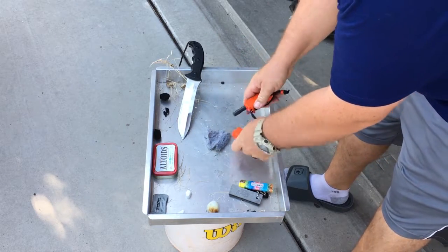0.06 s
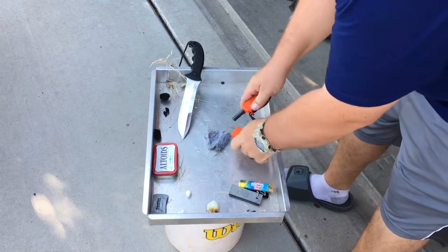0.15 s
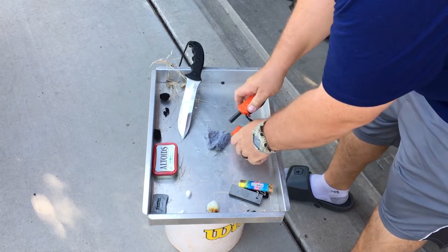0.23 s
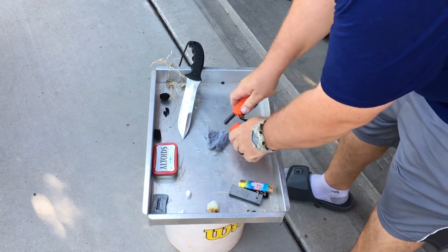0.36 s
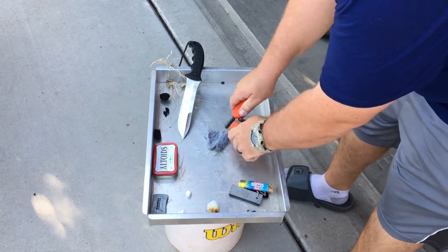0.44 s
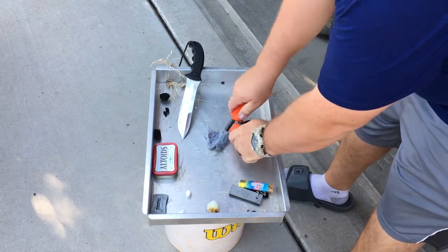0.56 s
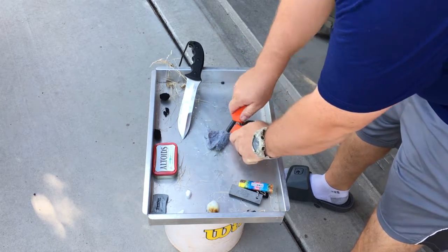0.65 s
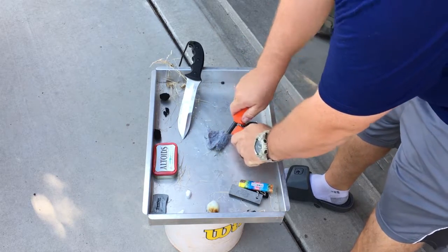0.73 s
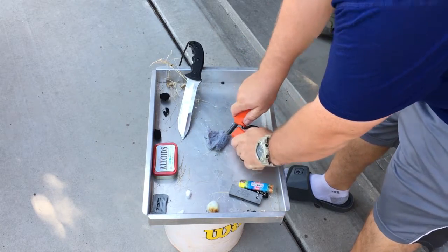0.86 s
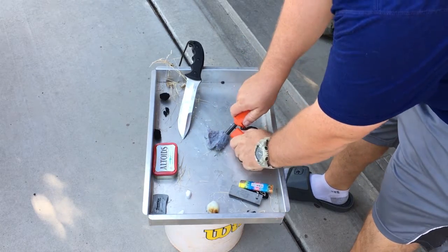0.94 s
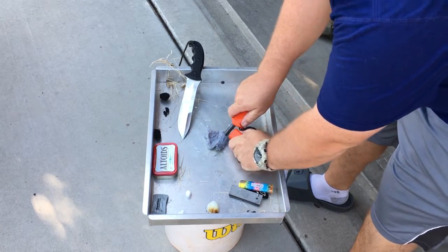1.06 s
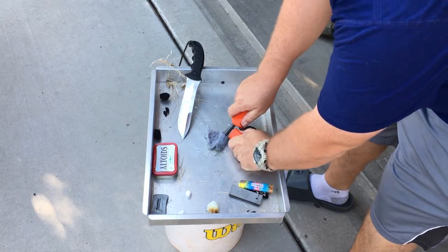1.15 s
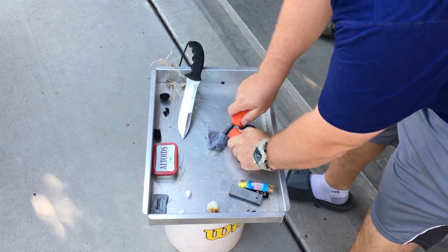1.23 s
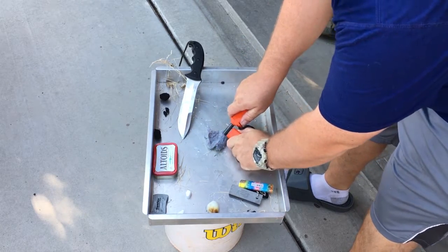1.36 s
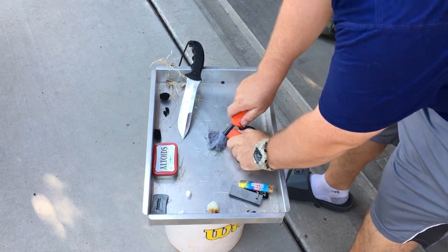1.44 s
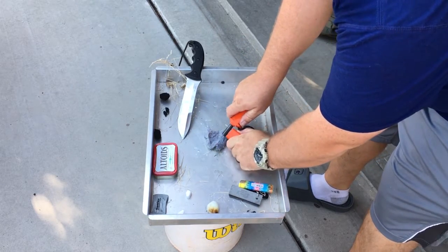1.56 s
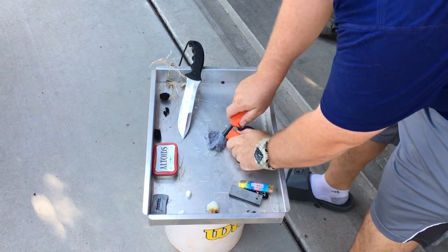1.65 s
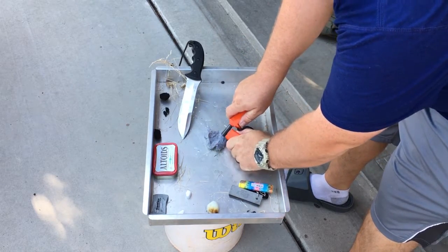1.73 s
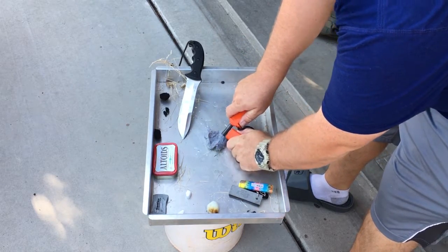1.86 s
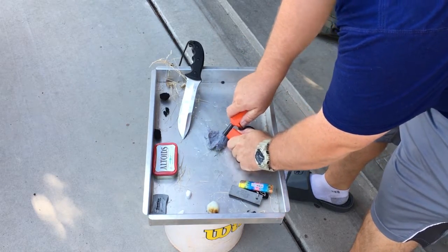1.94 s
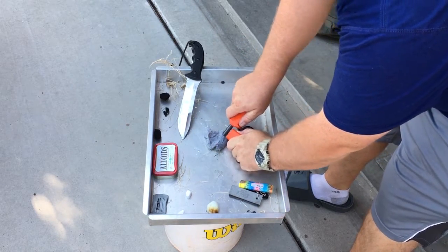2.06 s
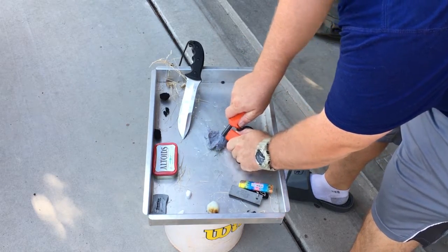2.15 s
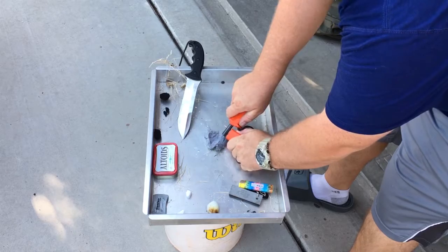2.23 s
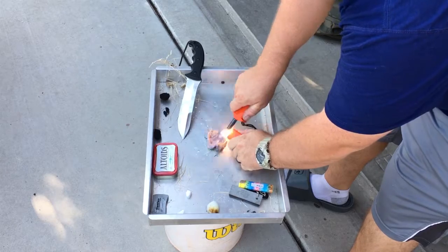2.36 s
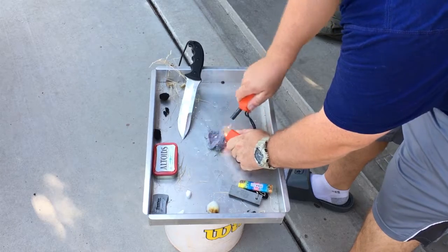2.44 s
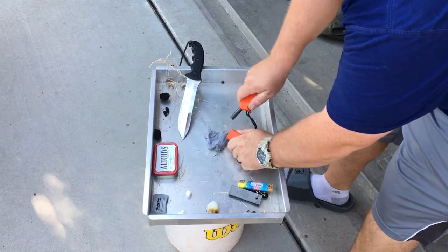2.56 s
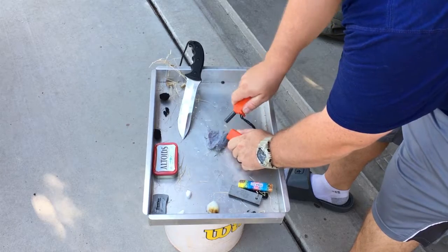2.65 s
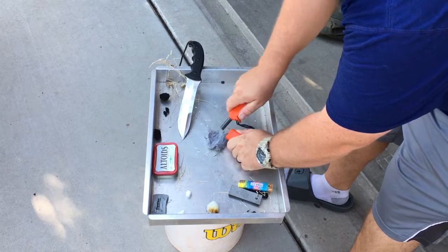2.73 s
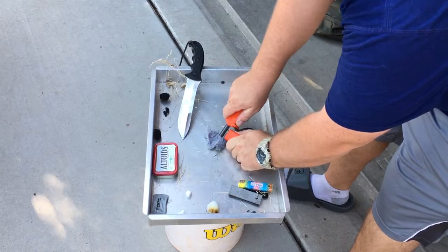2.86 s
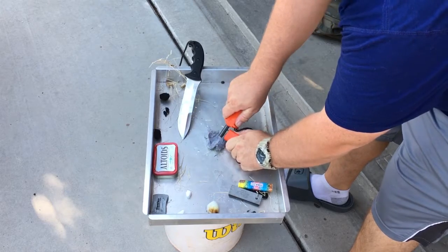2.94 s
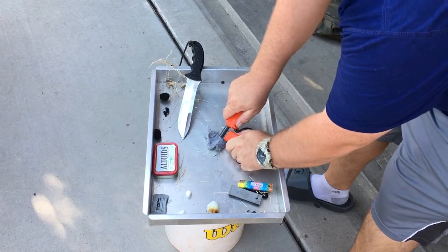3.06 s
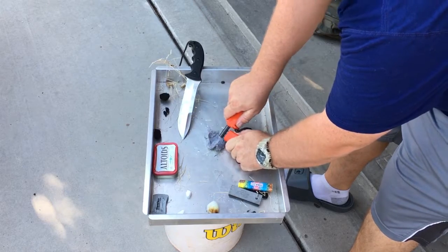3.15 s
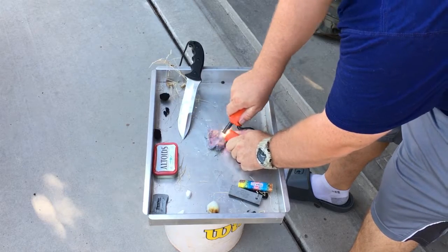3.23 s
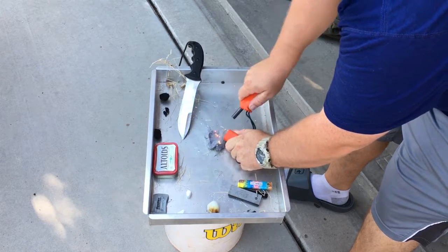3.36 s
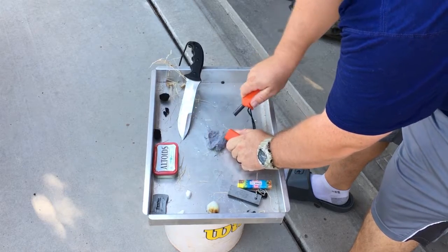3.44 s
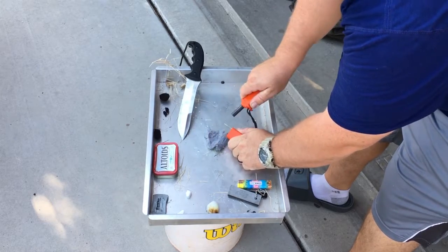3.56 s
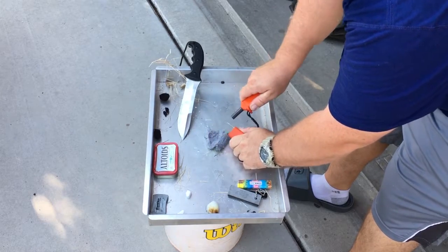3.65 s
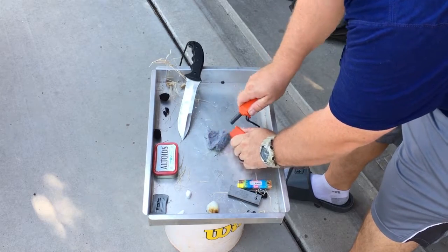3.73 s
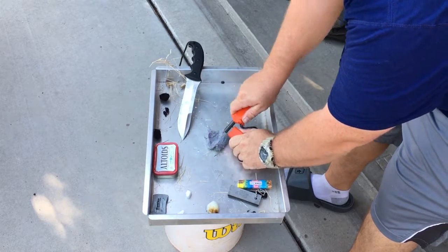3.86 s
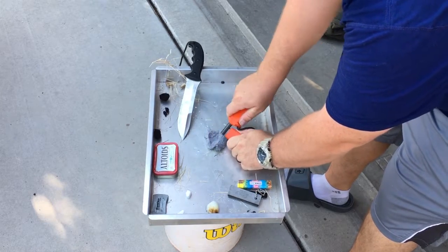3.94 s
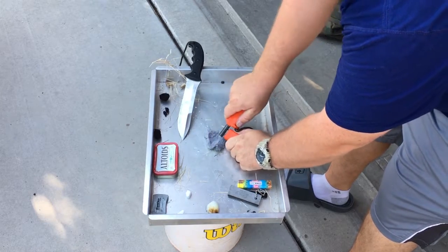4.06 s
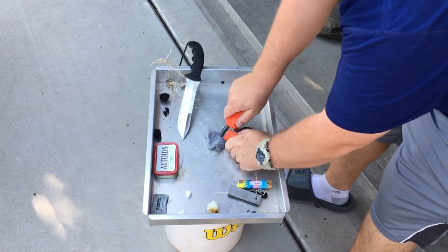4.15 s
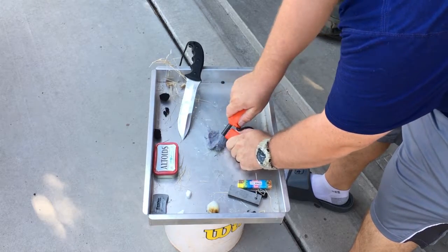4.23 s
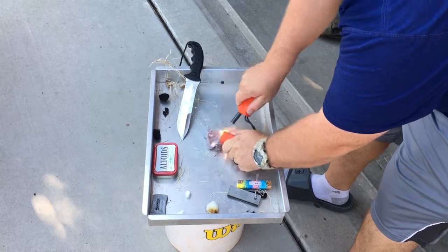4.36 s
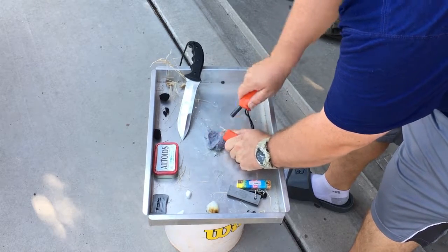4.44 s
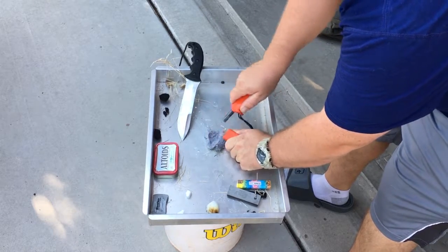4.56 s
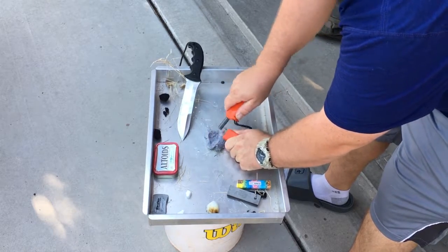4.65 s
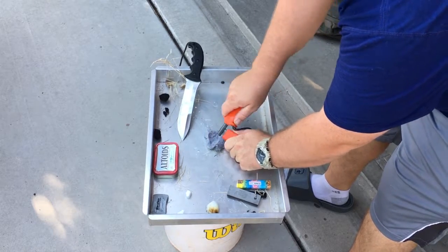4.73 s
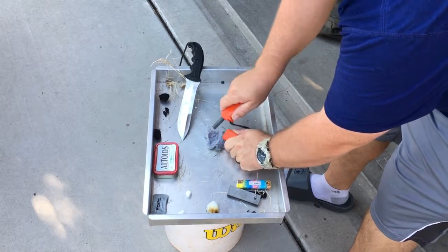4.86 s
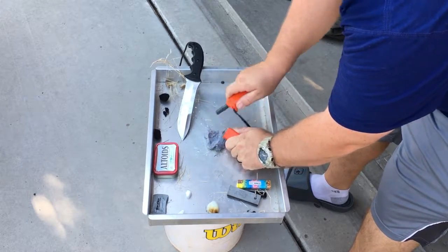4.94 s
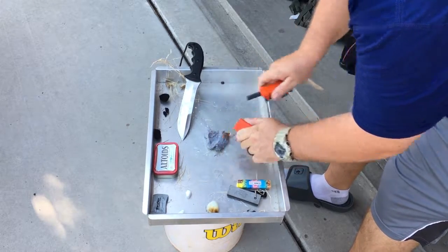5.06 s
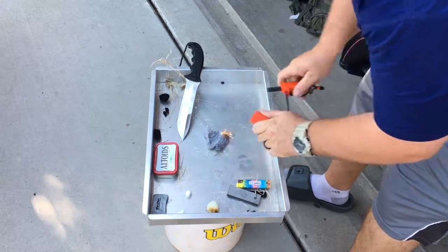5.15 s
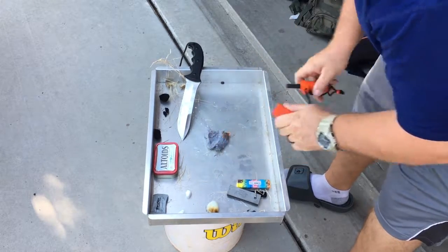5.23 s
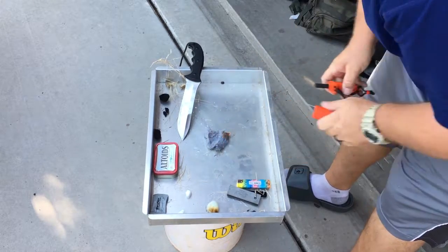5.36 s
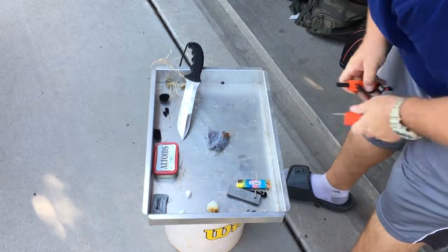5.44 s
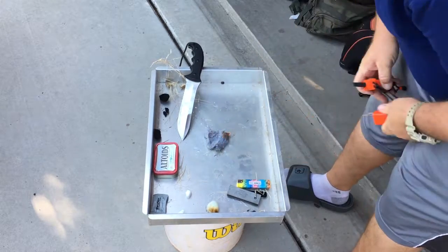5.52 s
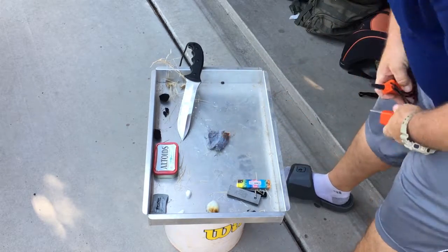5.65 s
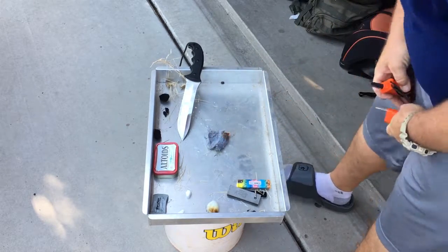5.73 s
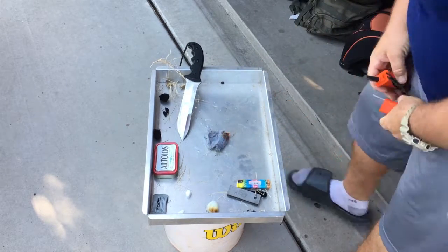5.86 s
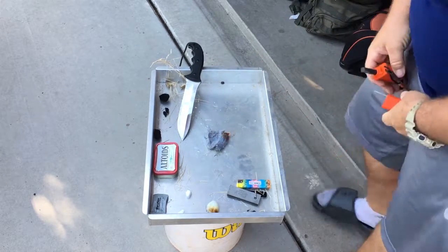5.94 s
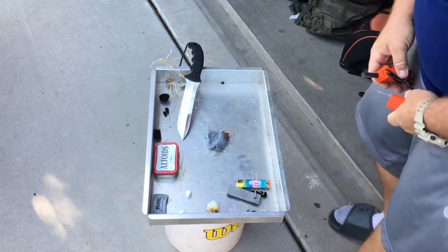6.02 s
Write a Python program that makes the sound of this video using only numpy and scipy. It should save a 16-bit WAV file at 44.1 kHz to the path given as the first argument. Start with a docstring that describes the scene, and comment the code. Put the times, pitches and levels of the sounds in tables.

```python
"""A steel striker clicks sharply onto a ferrocerium rod and is scraped down it three times, over a metal tray.
Clicks are short bursts of ringing steel; scrapes are gritty noise that also rings the rod.
Small rubs come before each stroke, the edge snaps off the end, and sparks flare and sputter as fluttering noise.
Soft knocks and brushes of cloth are shaped noise. A motor, built from sine tones and noise, hums over
a low outdoor rumble and hiss; nearby walls give a short echo made of fading noise."""
import sys
import numpy as np
from scipy import signal
from scipy.fft import rfft, irfft
from scipy.io import wavfile
from scipy.ndimage import uniform_filter1d

SR = 44100
rng = np.random.default_rng(int(sys.argv[2]) if len(sys.argv) > 2 else 0)


def materialize(psi):
    """Save the field psi as 16-bit PCM at rate SR to the path in sys.argv[1].

    A 1-D psi becomes a single channel; in a 2-D psi each row is a channel.
    """
    bounded = np.clip(np.atleast_2d(psi).T, -1, 1)
    quanta = np.round(bounded * 32767).astype(np.int16)
    wavfile.write(sys.argv[1], SR, quanta)


N = 268597
T = np.arange(N) / SR
FREQ = np.maximum(np.arange(N // 2 + 1) * SR / N, 1)

# full strokes down the rod: (start t/s, length/s, level before judder/dB, pitch factor, rod ring level/dB,
# tilt/dB per octave, judder depth/dB, end snap level/dB, snap pitch factor, flame level/dB)
STROKES = [(2.413, .0712, -37.5, 1.01, 2.5, 1.1, 12, -28.5, .9, -54.5),
           (3.327, 0.058, -38.5, 1, 1, .6, 2.5, -36.5, 1.03, -50.5),
           (4.3695, 0.056, -35.5, 1.03, -2, .3, 4.5, -28.5, 0.805, -49.5)]
# colour of the shavings tearing off: (f/Hz, level/dB)
RASP = [(300, -27), (900, -9.5), (1400, -11.5), (2250, 6.5), (2800, -7), (3400, 5.5), (4500, 0), (5600, 4),
        (7000, -4), (8200, 1), (9900, -2.5), (10700, -13), (12000, -14)]


def undb(db):
    """Turn decibels into a gain."""
    return 10 ** (np.asarray(db) / 20)


def unit(x):
    """Scale to an rms (average strength) of 1."""
    return x / np.sqrt(np.mean(x ** 2))


def add(out, s, x):
    """Mix x into out from time s on."""
    i = int(s * SR)
    out[i:i + len(x)] += x[:N - i]


def bins(x):
    """Frequencies of the spectrum of x in Hz, at least 1 so that logarithms work."""
    return np.maximum(np.arange(len(x) // 2 + 1) * SR / len(x), 1)


def colour(x, points):
    """Filter along a curve of (Hz, dB) points; rms 1."""
    hz, db = np.transpose(points)
    curve_db = np.interp(np.log(bins(x)), np.log(hz), db)
    return unit(irfft(rfft(x) * undb(curve_db), len(x)))


def tilt(x, slope_db):
    """Brighten or dull by dB per octave; rms 1."""
    return unit(irfft(rfft(x) * undb(slope_db * np.log2(bins(x))), len(x)))


def resonate(x, modes):
    """Pass through resonances, each (Hz, width in Hz, dB); rms 1."""
    f = bins(x)
    response = sum(undb(db) / (1 + 1j * (f * f - hz * hz) / (f * width)) for hz, width, db in modes)
    return unit(irfft(rfft(x) * response, len(x)))


def grit(n, spread_db):
    """Noise like dense tiny fractures of uneven size."""
    size_db = abs(spread_db) * np.minimum(rng.exponential(size=n), 4)
    return rng.standard_normal(n) * undb(size_db)


def walk(rate):
    """Smooth random drift from `rate` new random values per second; rms 1."""
    k = int(SR / rate)
    steps = np.repeat(rng.standard_normal(N // k + 2), k)
    return unit(uniform_filter1d(uniform_filter1d(steps, k), k)[:N])


def bell(s, half):
    """A smooth swell centred on time s."""
    return np.exp(-.5 * np.minimum(np.abs(T - s) / half, 10) ** 2)


def clicks():
    """The striker clicks onto the rod, and snaps off its end as each stroke finishes."""
    # striker set down on the rod: (t/s, level/dB, ring length factor, pitch factor, tilt/dB per octave,
    # free rod ring level/dB)
    landings = [(0.4968, -23.5, 2.05, 0.971, -1, -17.5), (2.9229, -22, 1.18, 0.98, 2, -35),
                (3.9589, -23.5, 1.5, 0.96, -0.5, -34), (4.8604, -25, 0.97, 0.97, 2.5, -43),
                (5.8088, -56.5, 0.68, 0.94, 0, -45)]
    snap_ring, snap_tilt_db, snap_free_db = 1.66, 7, -42  # ring length factor, dB per octave, free rod ring
    out = np.zeros(N)
    for s, db, ring, pitch, tilt_db, free_db in landings:
        add(out, s, undb(db) * click(ring, pitch, tilt_db, free_db))
    for s, length, *_, snap_db, snap_pitch, _ in STROKES:
        add(out, s + length, undb(snap_db) * click(snap_ring, snap_pitch, snap_tilt_db, snap_free_db))
    # such small parts radiate little bass
    return signal.sosfilt(signal.butter(2, 650, "highpass", fs=SR, output="sos"), out)


def click(ring, pitch, tilt_db, free_db, contact_s=0.00035, crack_db=-6, crack_s=0.0018,
          scatter_db=-21.0, scatter_t60=.22, free_t60=0.17):
    """A contact rings the hand-damped steel for a few milliseconds, with a gritty crack that scatters round the tray."""
    # striker and rod damped by the hands: (f before pitch factor/Hz, width before ring factor/Hz,
    # level before tilt and width weighting/dB)
    steel = [(1546, 270, -6.5), (2217, 420, -2.5), (3470, 175, -1.5), (3945, 320, -4), (4410, 110, -5.5),
             (5850, 170, -14.5), (6480, 550, -0.5), (7260, 350, 3), (8920, 420, -3.5), (10070, 410, -5)]
    # colour of the crack of steel on the rod: (f/Hz, level/dB)
    crack_colour = [(400, -19), (1100, -3.5), (1500, 1.5), (2200, 0.5), (2850, -8), (3800, 5), (4900, -2),
                    (5700, 4), (6600, 5.5), (8000, 3.5), (9600, -1.5), (12000, -16)]
    # the rod's two bending planes: (f/Hz, width/Hz, level/dB)
    free_rod = [(3880, 63, 5), (3900, 34, 2)]
    t = T[:12000]
    blow = SR // 500  # the first 2 ms set the loudness
    body = 0
    for k, (hz, width, mode_db) in enumerate(steel):
        # neighbouring modes swing opposite ways
        size = (-1) ** k * width * undb(mode_db + tilt_db * np.log2(hz))
        body = body + size * np.exp(-np.pi * width * t / ring) * np.sin(2 * np.pi * hz * pitch * t)
    body *= 1 - np.exp(-t / contact_s)
    body = body / np.std(body[:blow])
    snap = undb(crack_db) * np.exp(-t / (crack_s * ring))
    scatter = undb(scatter_db) * np.sqrt(ring) * np.exp(-np.log(1000) * t / scatter_t60)
    crack = colour(rng.standard_normal(len(t)), crack_colour) * (snap + scatter)
    # when the striker bounces clear the rod sings on, its note blurred by reflections
    song = resonate(rng.standard_normal(len(t)), free_rod)
    free = undb(free_db) * np.exp(-np.log(1000) * t / free_t60) * song
    return body + crack + free


def scrapes():
    """Light rubs advance in nudges; a full stroke judders as it bites, then runs evenly to the end."""
    # light rubs that seat the edge, each a run of nudges: (start t/s, length/s, starting level/dB, pitch factor)
    rubs = [(2.214, .031, -61, 1.26), (2.263, 0.032, -54.5, 0.98), (3.123, .014, -60.5, .95),
            (3.182, .058, -56, 0.94), (4.137, 0.075, -58, .97), (4.332, .026, -48, .95)]
    nudge_s, nudge_share, stuck_db = 0.0224, 0.54, -25  # spacing, share spent sliding, level between
    rub_tilt_db, rub_ring_db = -2, -2  # dB per octave, and ring of the rod, under light pressure
    rub_ease_db_per_s = 52  # the pressure eases along each run
    judder_hz, judder_s = 56, 0.044  # the edge skips as it bites, then settles
    out, t = np.zeros(N), T[:6000]
    sliding = t / nudge_s % 1 < nudge_share
    nudges = uniform_filter1d(np.where(sliding, 1., undb(stuck_db)), size=96)
    for s, length, db, pitch in rubs:
        pressure = undb(db - rub_ease_db_per_s * t)
        add(out, s, pressure * nudges * drag(t, length, pitch, rub_ring_db, rub_tilt_db))
    skips = np.sin(np.pi * judder_hz * t) ** 2 * np.exp(-t / judder_s)
    for s, length, db, pitch, ring_db, tilt_db, judder_db, *_ in STROKES:
        add(out, s, undb(db - judder_db * skips) * drag(t, length, pitch, ring_db, tilt_db))
    return out


def drag(t, length, pitch, ring_db, tilt_db, bite_s=0.0016, release_s=0.0036, slip_db=2.0):
    """The edge tears off shavings in uneven slips; they rasp and ring the rod, pitched by where it is pressed."""
    # the rod pressed against the edge: (f before pitch factor/Hz, width/Hz, level/dB)
    pressed_rod = [(1385, 120, -1.5), (3877, 40, 1.5), (4387, 91, 3.5), (4630, 91, -23), (5150, 200, -31),
                   (5750, 120, -25), (7760, 90, -12), (8100, 70, -6), (9520, 270, -5.5)]
    tearing = colour(grit(len(t), spread_db=0.5), RASP)
    modes = [(hz * pitch, width, mode_db) for hz, width, mode_db in pressed_rod]
    rod = resonate(grit(len(t), spread_db=3.5), modes)
    force = (1 - np.exp(-t / bite_s)) * np.exp(-np.maximum(t - length, 0) / release_s)
    slips = unit(undb(slip_db * walk(rate=600)[:len(t)]))
    return force * slips * tilt(tearing + undb(ring_db) * rod, tilt_db)


def sparks():
    """Sparks grow along each stroke and burn out fluttering, topped by a fine fizz; a few shavings pop late."""
    # colour of the burning: (f/Hz, level/dB)
    flame_colour = [(60, -40), (200, 9.5), (350, -1), (700, 3.5), (1300, -1), (2300, -8.5), (2900, -9),
                    (5000, -19), (12000, -43)]
    # larger shavings that flare up late: (t/s, half length/s, level/dB, fizz level/dB)
    pops = [(2.503, 0.0037, -52, 2), (2.548, 0.0027, -64, -3), (2.583, 0.0038, -48, -15),
            (2.621, 0.0029, -58, -20), (3.46, 0.0066, -49, -1.5), (3.495, .0053, -53, -11),
            (4.496, 0.006, -55, -5)]
    hold_s, fade_s, flutter_db, shower_fizz_db = .012, 0.062, 2.5, -8
    flame = colour(rng.standard_normal(N), flame_colour)
    fizz = colour(grit(N, spread_db=4.0), RASP)
    shower = 0
    for s, length, *_, flame_db in STROKES:
        growth = np.clip((T - s) / length, 0, 1)
        burnout = np.exp(-np.maximum(T - s - length - hold_s, 0) / fade_s)
        shower = shower + undb(flame_db) * growth * burnout
    flutter = undb(flutter_db * walk(rate=120))
    out = shower * flutter * (flame + undb(shower_fizz_db) * fizz)
    for s, half, db, fizz_db in pops:
        out = out + undb(db) * bell(s, half) * (flame + undb(fizz_db) * fizz)
    return out


def handling():
    """Dull knocks as the hands leave the tray, and brushes of cloth that swell and turn duller as they come to rest."""
    # soft knocks as the weight comes off the tray: (t/s, level/dB)
    knocks = [(5.104, -49.5), (5.146, -50.5), (5.249, -55.5), (5.299, -55)]
    # colour of a knock: (f/Hz, level/dB)
    knock_colour = [(80, -3.5), (190, -2.5), (290, 3), (450, -15), (800, -15), (1500, -20.5), (3000, -27.5),
                    (10000, -43.5)]
    # cloth brushing: (peak t/s, level/dB)
    brushes = [(5.277, -67.5), (5.939, -45)]
    # colour of cloth before tilting: (f/Hz, level/dB)
    cloth = [(710, -22), (1200, -13), (1600, -4.5), (1730, -3), (1870, -1.5), (2400, -7.5), (4040, 3),
             (6110, -3.5), (8730, 2.5), (11200, -1.5), (12000, -13), (15600, -44), (22000, -120)]
    knock_s, rise_s, fall_s = 0.008, 0.029, 0.0099  # widths of a knock, and of a brush's swell and release
    fast_db, slow_db, slowing_s = 0.5, -3.5, 0.031  # dB per octave sliding and stopping, time between
    thuds = sum(undb(db) * bell(s, knock_s) for s, db in knocks)
    out = colour(rng.standard_normal(N), knock_colour) * thuds
    fibres = colour(rng.standard_normal(N), cloth)
    fast, slow = tilt(fibres, fast_db), tilt(fibres, slow_db)
    for s, db in brushes:
        speed = np.clip((s - T) / slowing_s, 0, 1)
        swell = bell(s, np.where(T < s, rise_s, fall_s))
        out = out + undb(db) * swell * (speed * fast + (1 - speed) * slow)
    return out


def echo(x, walls_db=-11, walls_t60=.28, early_db=-13, early_t60=0.019, gap_s=0.0032):
    """Quick scatter from tray and ground, and a short tail from the walls; t60 is the time to fade by 60 dB."""
    t = T[:SR // 2]
    # colour of the reflections: (f/Hz, level/dB)
    tone = [(150, -11.5), (1000, 10.0), (2800, 2), (4000, 3.0), (5200, -1), (6700, 9.0), (9000, -1.5), (12000, 3)]
    response = 0
    for db, t60 in ((walls_db, walls_t60), (early_db, early_t60)):
        fade = np.exp(-np.log(1000) * t / t60) * (t > gap_s)
        tail = colour(rng.standard_normal(len(t)), tone) * fade
        response = response + undb(db) * tail / np.sqrt(np.sum(tail ** 2))
    return signal.fftconvolve(x, response)[:N]


def background(rumble_db=-50.5, casing_db=-54, air_db=-62, waver_db=2, drift=0.00146):
    """A steady motor with slightly wavering tones, over low rumble and distant hiss."""
    # motor hum: (multiple of the shaft rate, rms level before wavering/dB)
    hum_lines = [(1, -60), (2, -58), (6, -79), (12, -81), (18, -77.5), (19, -76), (20, -81)]
    # the motor's fan and casing: (f/Hz, width/Hz, level/dB)
    casing_modes = [(103.1, 8, -1.5), (127.8, 23.8, -3.5), (213.3, 14, -22), (599.6, 16, -23.5),
                    (1364, 11, -21.5)]
    # colour of the hiss: (f/Hz, level/dB)
    air_colour = [(120, -50.5), (200, -4.5), (225, -0.5), (259, -10), (346, -10.5), (397, -16.5),
                  (559, -15.5), (609, -15), (888, -16), (1050, -14), (1270, -16.5), (2280, -19),
                  (2700, -25), (8520, -37), (12000, -48), (15600, -100), (22000, -120)]
    # colour of the rumble: (f/Hz, level/dB)
    rumble_colour = [(15, -59), (30, -25), (42, -3), (56, -1.5), (78, 1), (110, -2), (142, -13.5),
                     (165, -13), (230, -18.5), (400, -54)]
    shaft_hz = 57.57 * (1 + drift * walk(rate=4))
    turn = 2 * np.pi * np.cumsum(shaft_hz) / SR
    hum = 0
    for k, db in hum_lines:
        level = np.sqrt(2) * undb(db + waver_db * walk(rate=4.97))  # root 2 turns rms into peak
        hum = hum + level * np.sin(round(k) * turn + 2 * np.pi * rng.random())
    low = colour(rng.standard_normal(N), rumble_colour)
    peaks = sum(undb(db) * np.exp(-((FREQ - hz) / width) ** 2) for hz, width, db in casing_modes)
    casing = unit(irfft(rfft(rng.standard_normal(N)) * peaks, N))
    air = colour(rng.standard_normal(N), air_colour) * undb(air_db + 0.22 * walk(rate=5.95))
    return hum + undb(rumble_db) * low + undb(casing_db) * casing + air


def scene(click_echo_db=-13):
    """Striking sparks, with their echo and the surroundings; the clicks echo more weakly than the rest."""
    taps = clicks()
    rubs = scrapes() + sparks() + handling()
    echoes = echo(rubs + undb(click_echo_db) * taps)
    return (taps + rubs + echoes + background())[None, :]


def record(dry):
    """Cut the treble steeply above 11950 Hz."""
    return signal.sosfilt(signal.ellip(10, .2, 70, 11950, fs=SR, output="sos"), dry)


dry = scene()
out = record(dry)
materialize(out)
```